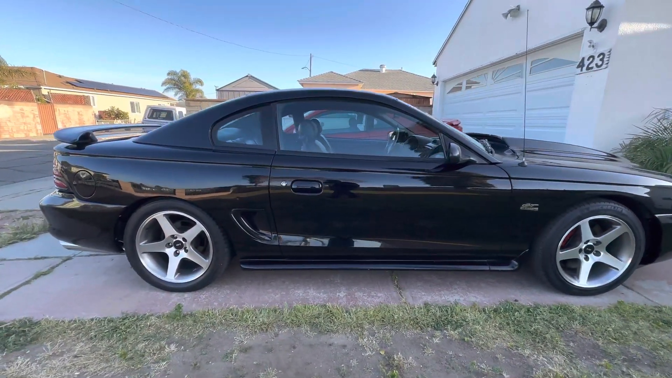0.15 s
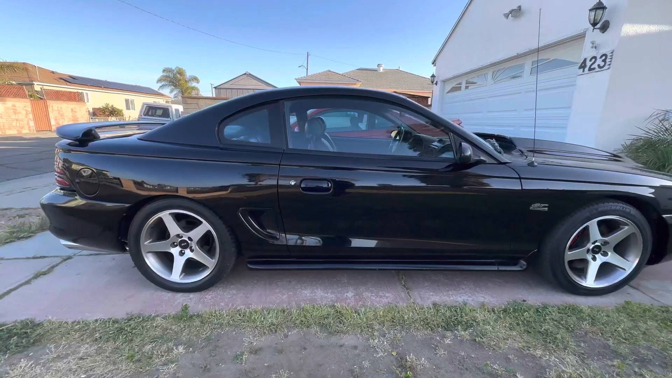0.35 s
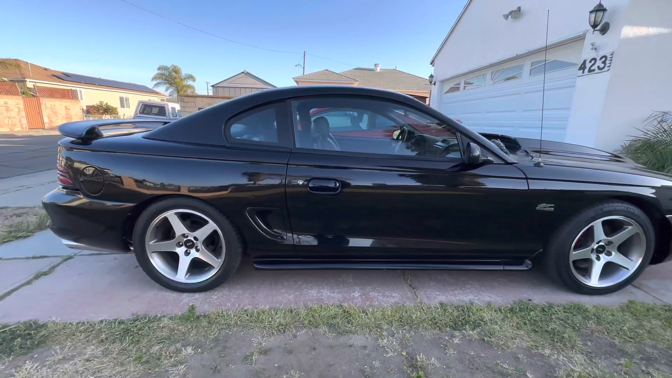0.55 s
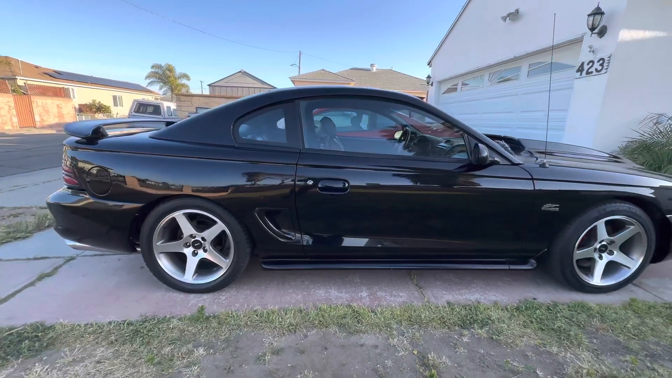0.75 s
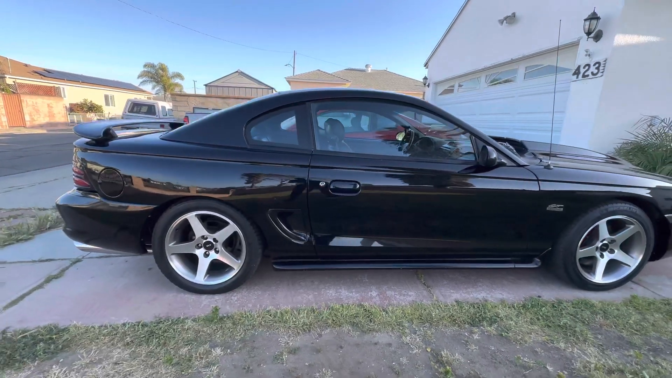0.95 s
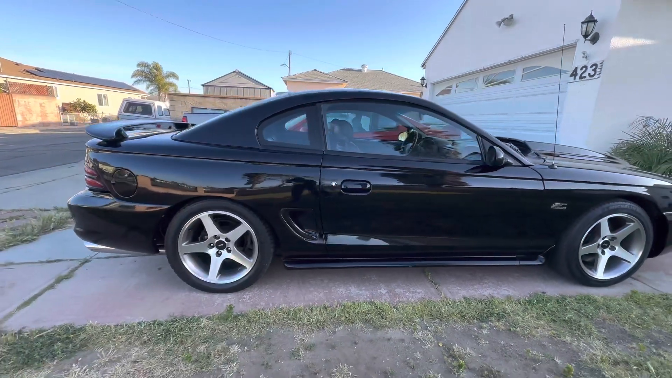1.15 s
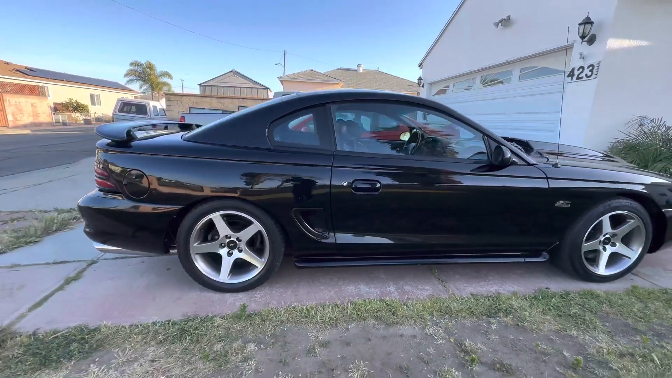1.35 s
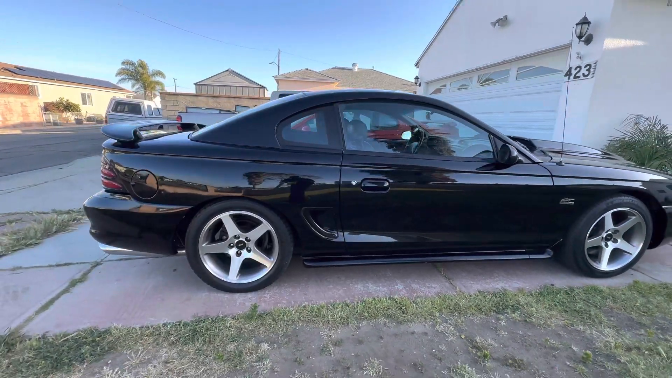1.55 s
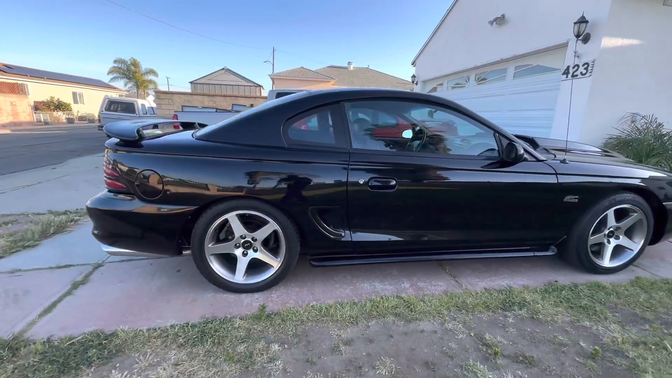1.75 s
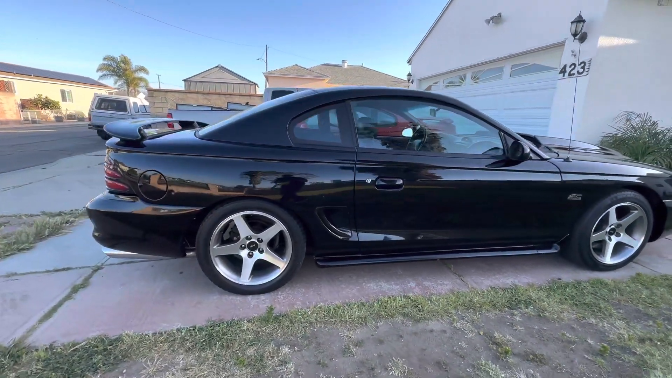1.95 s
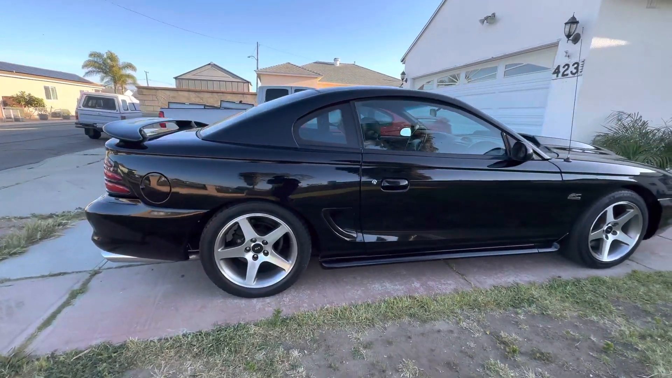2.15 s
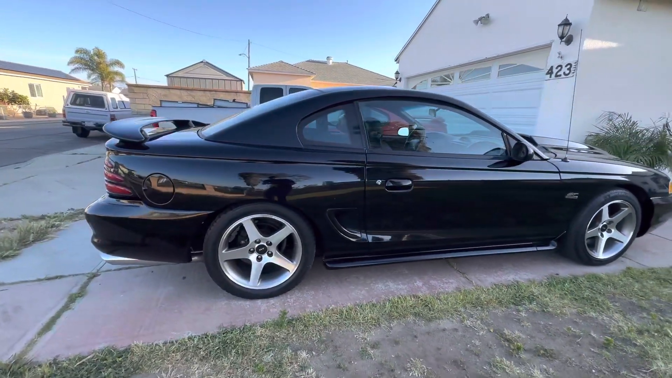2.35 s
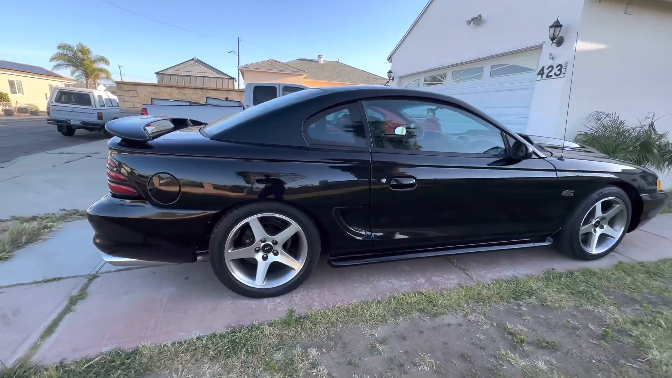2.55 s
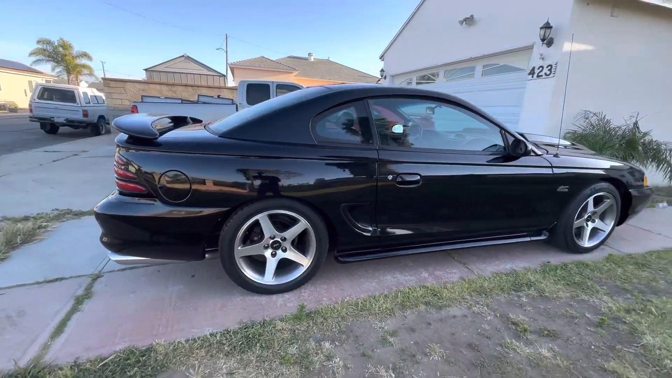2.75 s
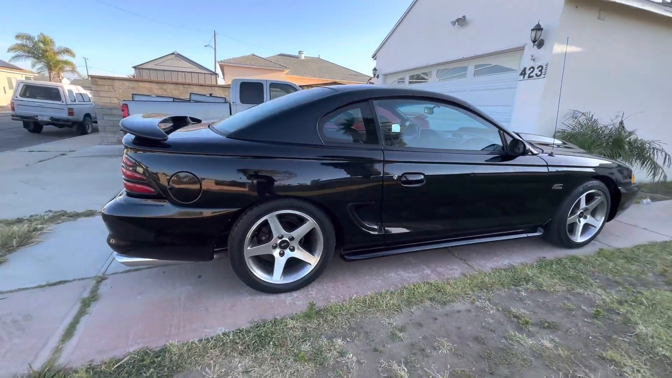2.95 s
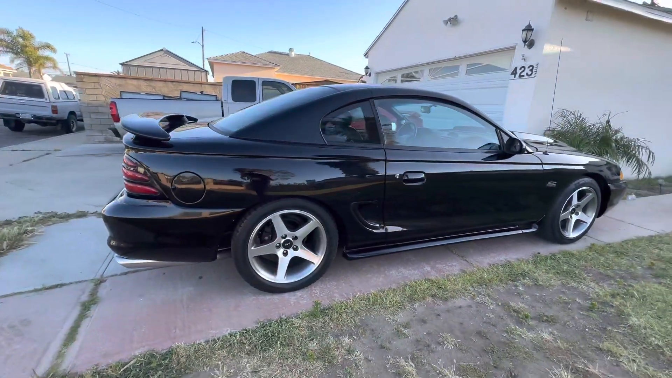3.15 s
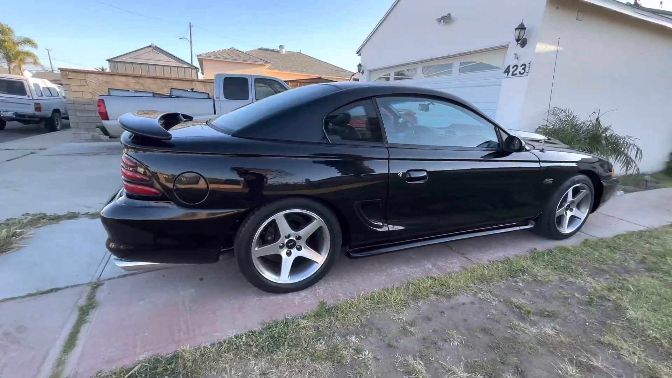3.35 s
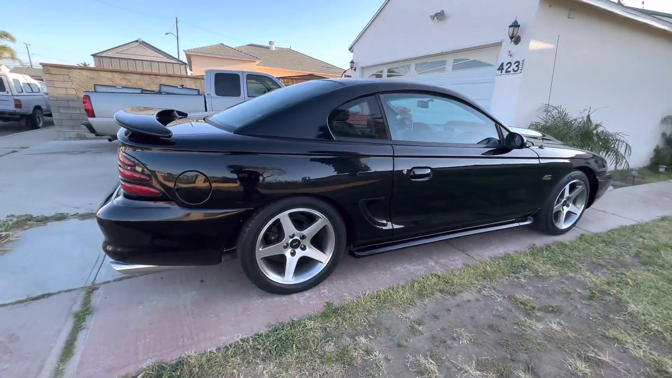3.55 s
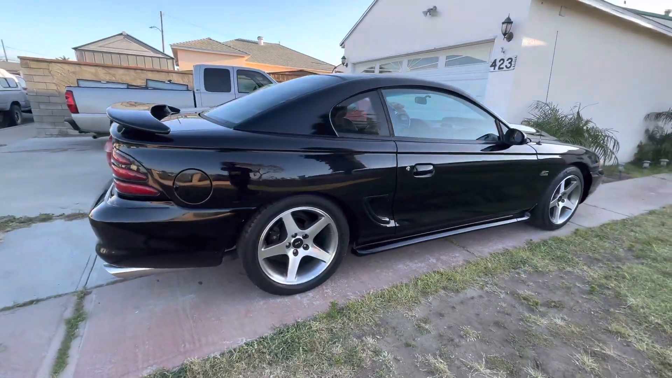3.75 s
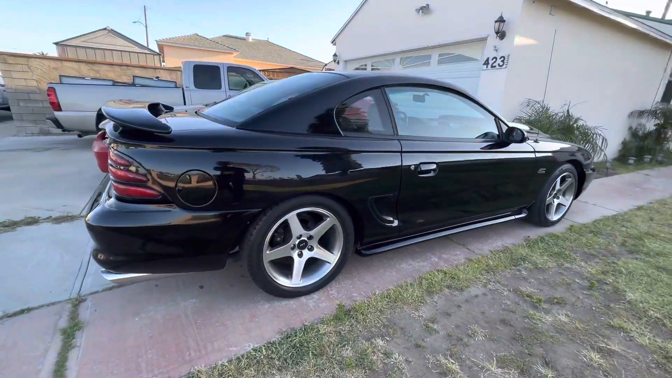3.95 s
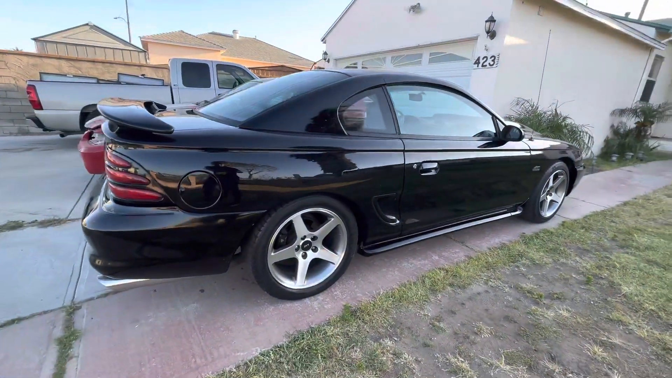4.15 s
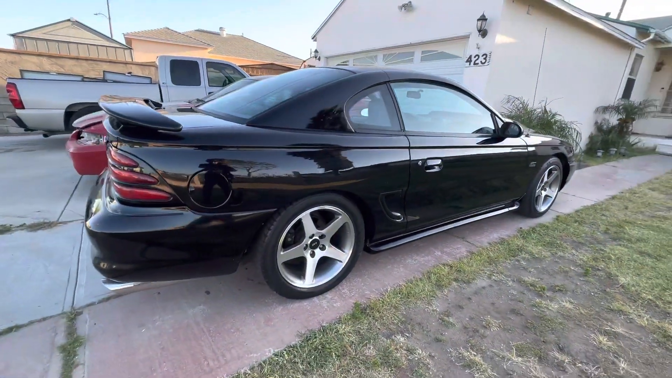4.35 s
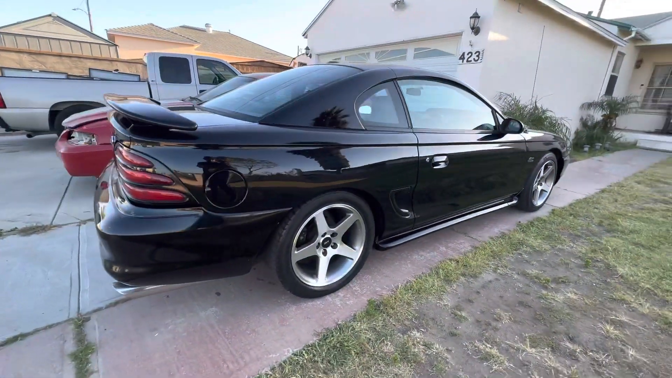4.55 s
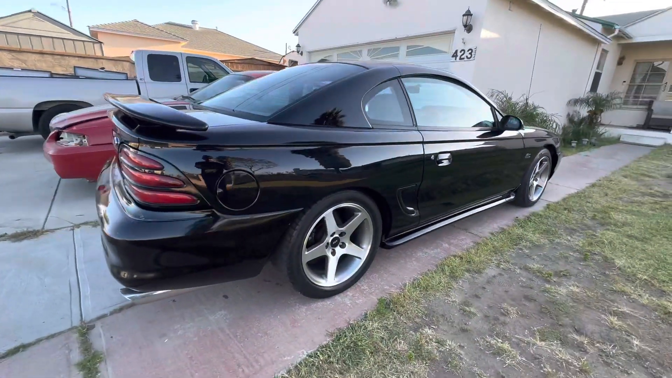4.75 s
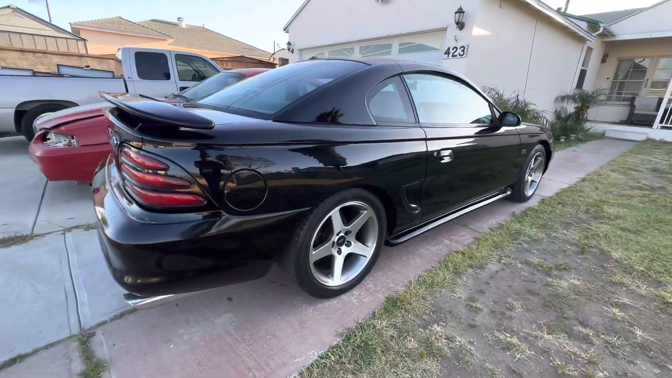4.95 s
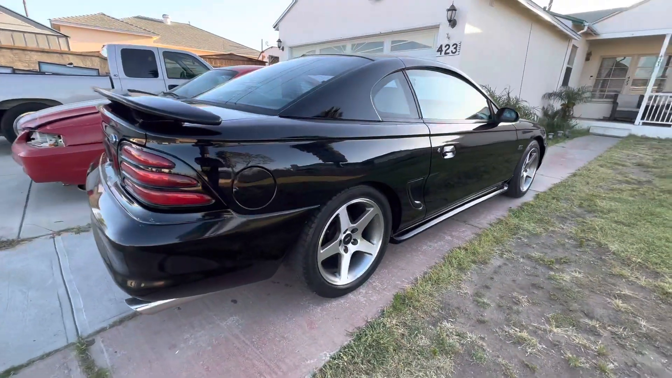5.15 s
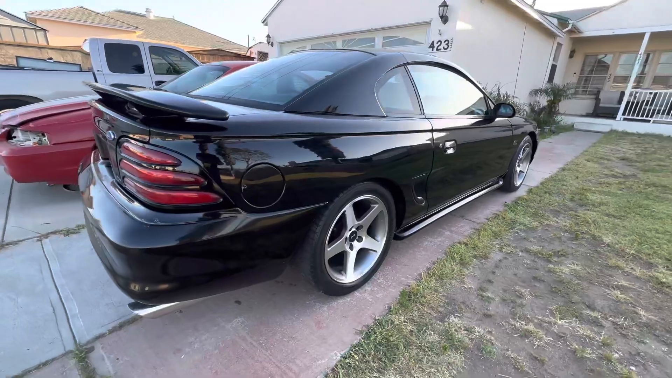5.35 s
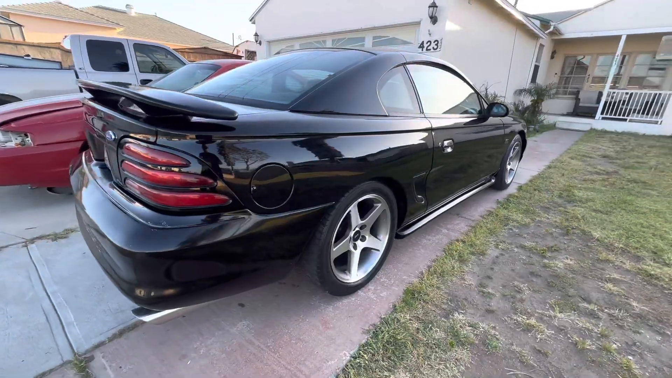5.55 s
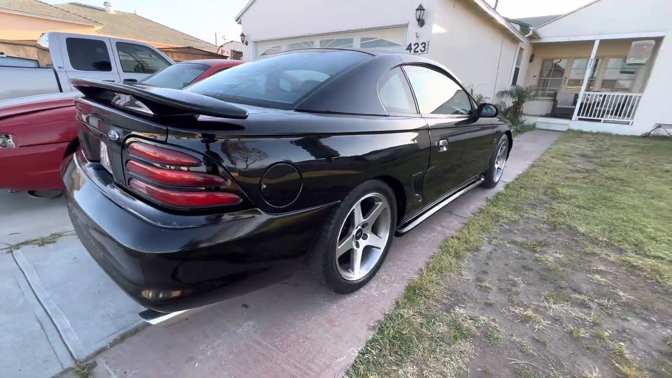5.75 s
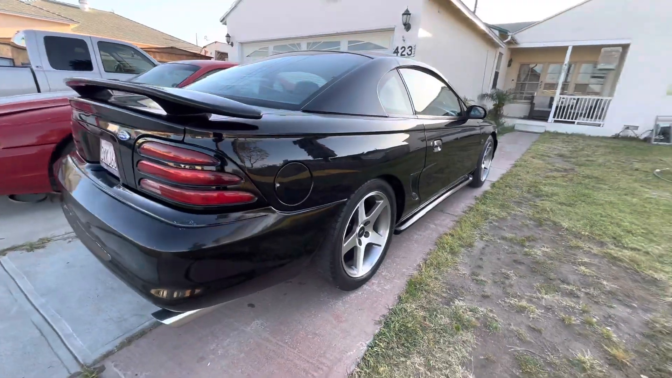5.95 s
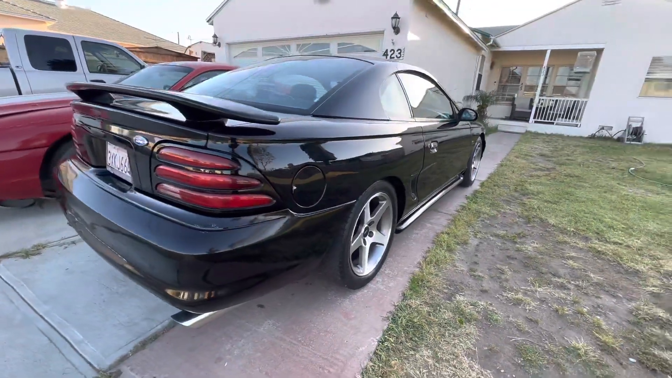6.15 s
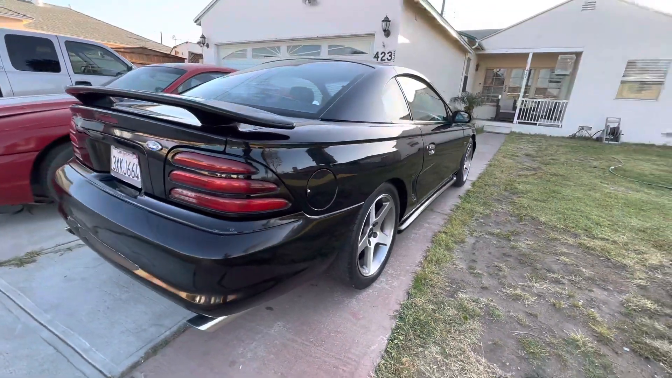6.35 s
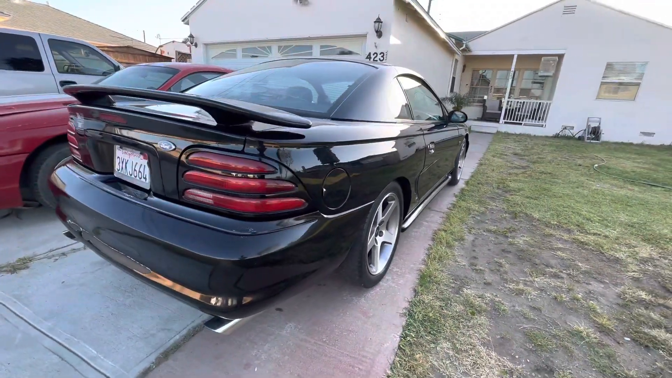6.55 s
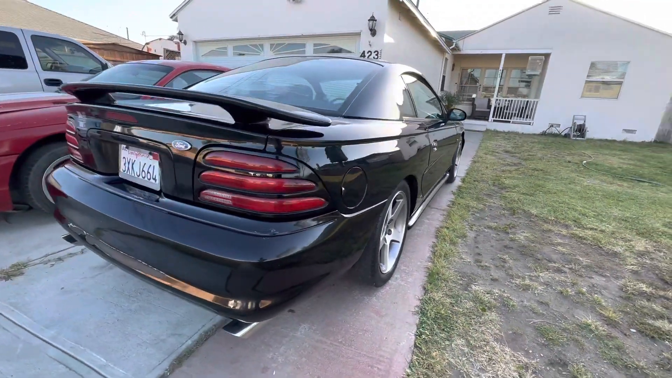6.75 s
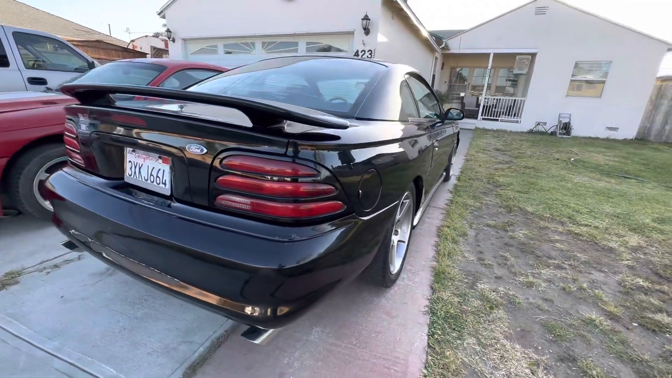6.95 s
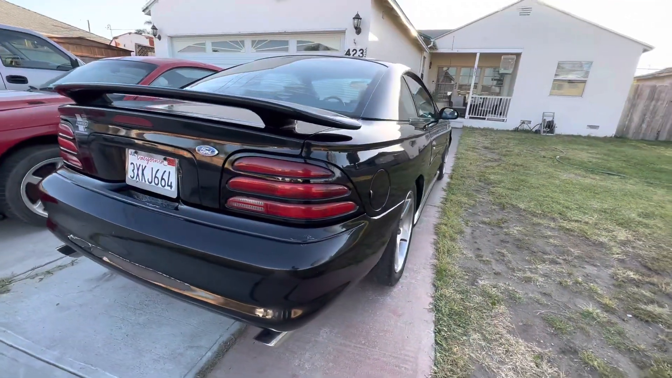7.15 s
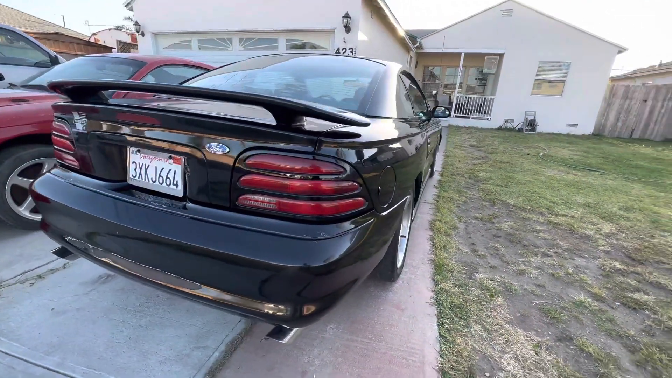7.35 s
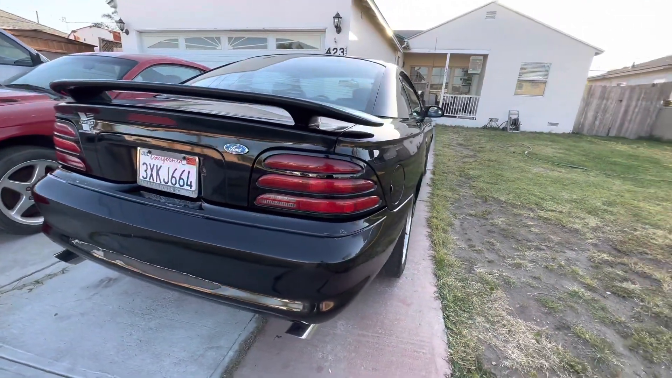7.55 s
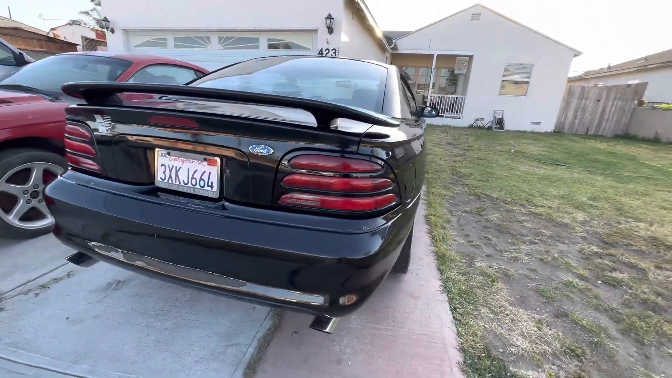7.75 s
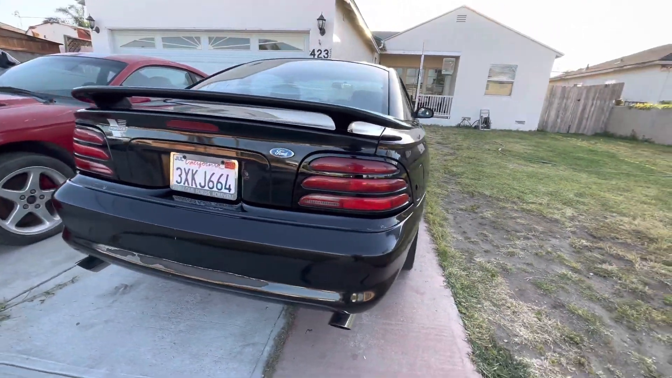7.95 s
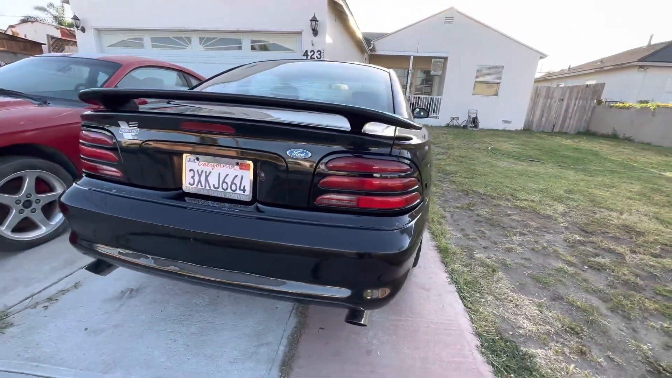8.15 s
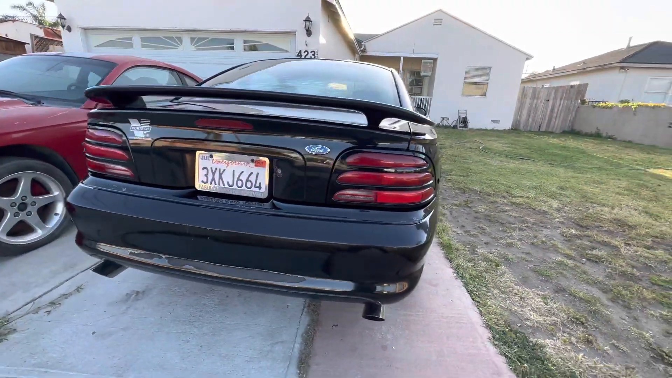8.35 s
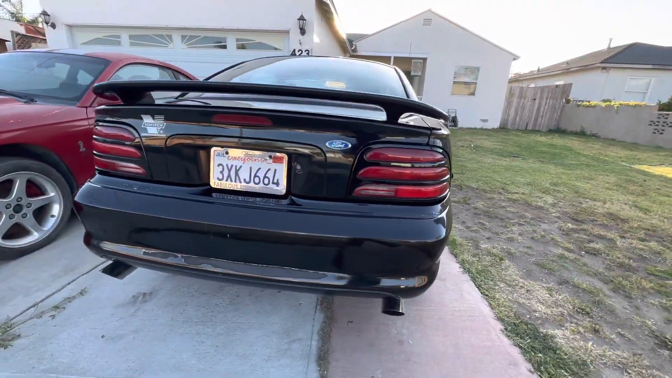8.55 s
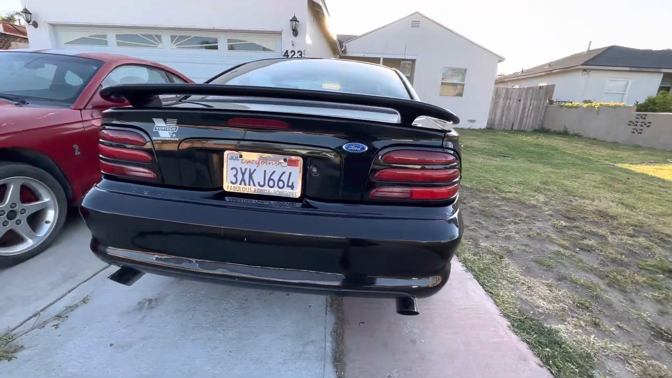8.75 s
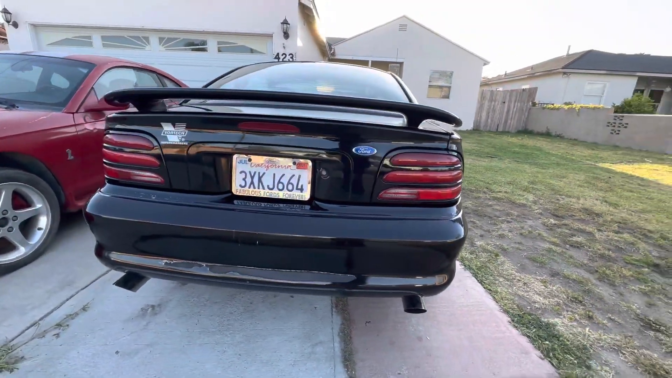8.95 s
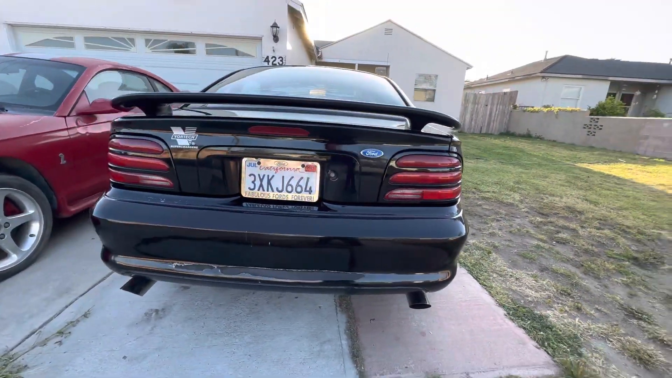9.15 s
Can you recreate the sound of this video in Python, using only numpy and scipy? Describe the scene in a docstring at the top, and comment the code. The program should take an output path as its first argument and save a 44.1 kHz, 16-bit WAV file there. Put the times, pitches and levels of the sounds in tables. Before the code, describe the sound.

Uneven, throaty V8 idle outdoors: belt whir, ticking and faint blower whine give way to deep thumping tailpipe burble, with two tiny distant bird chirps.

```python
"""A lumpy supercharged V8 idles in a driveway while the microphone walks from its side round to the tailpipes.
Eight uneven firings a cycle thump and burble through two pipes, and the idle sags and recovers at each stumble.
At the side the engine bay whirs, hisses, ticks and whines, over a low drone that dies away within 2.5 s.
A far bird chirps at 4.1 s; towards the rear the bay gets duller and mostly quieter, and the exhaust swells.
The bird chirps again, fainter, at 8.4 s. Pulses and noise ring through filters; the tones are mostly wavering sines."""
import sys
import numpy as np
from scipy import signal
from scipy.fft import rfft, irfft
from scipy.io import wavfile
from scipy.ndimage import uniform_filter1d, map_coordinates

SR = 44100
rng = np.random.default_rng(int(sys.argv[2]) if len(sys.argv) > 2 else 0)


def wav_record(signal):
    """Record a signal, one row per channel, as 16-bit PCM in the file named by sys.argv[1]."""
    frames = np.transpose(np.atleast_2d(signal))
    bounded = np.clip(frames, -1, 1)
    # unit amplitude maps onto the largest positive 16-bit level
    quanta = np.round(bounded * 32767).astype(np.int16)
    wavfile.write(sys.argv[1], SR, quanta)


N = 410130
TIME = np.arange(N) / SR
EDGE_HZ = 15750  # top of the band

# Stumbles of the engine, each changing the burn and braking the crank.
# Each row: time in seconds, change of firing strength in dB, slowing at its onset in rpm per second.
STUMBLES = [(.272, -4, 619), (1.013, -7, 780), (1.876, -7, 950), (2.536, 2.5, 564), (3.02, -4, 403.7),
            (3.918, -9.5, 600), (4.517, -7, 734), (5.314, 0, 1616), (5.552, -2.5, 360), (6.182, -4, 997),
            (6.703, -1, 723), (7.162, -1.5, 662.6), (7.902, -1, 663), (8.278, -2, 663), (9.158, -2, 963)]
# Delay of the left microphone port behind the right along the walk.
# Each row: time in seconds, delay of the exhaust in ms, delay of the engine bay in ms.
BEARING = [(0, -0.58, 0.43), (4.8, -0.45, 0.39), (5.3, -0.46, 0.1), (7.7, -0.32, -0.058),
           (8.1, -0.26, -0.32), (9.3, -0.24, -0.35)]
# Engine bay along the walk, before the trim of each layer.
# Each row: time in seconds, whir in dB, hiss in dB (the ticks follow the hiss).
BAY = [(0, -34.5, -47.5), (2.2, -36.5, -50.5), (4.2, -35.5, -51), (5.6, -38.5, -52.5), (7, -39.5, -55.5),
       (8.3, -39.5, -57), (9.3, -38.5, -52)]


def gain_of(db):
    """Decibels to amplitude."""
    return 10 ** (np.asarray(db) / 20)


def curve(rows, axis=1):
    """One column of a timed table at every sample."""
    rows = np.array(rows)
    return np.interp(TIME, rows[:, 0], rows[:, axis])


def evened(x, band=None):
    """Scales a sound to unit rms, overall or within a band in Hz."""
    if band is None:
        return x / x.std()
    hz = np.fft.rfftfreq(N, 1 / SR)
    inside = rfft(x)[(hz >= band[0]) & (hz <= band[1])]
    return x * N / np.sqrt(2 * np.sum(abs(inside) ** 2))


def noise():
    """White noise."""
    return rng.standard_normal(N)


def swell(span_s):
    """Slow random drift of unit rms: noise averaged over a span."""
    return evened(uniform_filter1d(noise(), size=max(int(span_s * SR), 2)))


def colour(x, points, size=8192):
    """Minimum-phase filter with the given spectrum: each pulse rings after it lands."""
    f, db = np.transpose(points)
    hz = abs(np.fft.fftfreq(size, 1 / SR))
    log_gain = np.log(gain_of(np.interp(np.log(hz + 1), np.log(f), db, right=-90)))
    spectrum = np.exp(np.conj(signal.hilbert(log_gain)))
    taps = np.fft.ifft(spectrum).real[:size // 2]
    return signal.oaconvolve(x, taps)[:N]


def blow(x, points, rise_ms=6.04, lean=0.53, size=8192):
    """A slug of gas swells and ebbs; the tip radiates its rate of change, a push and then a suck."""
    f, db = np.transpose(points)
    hz = np.fft.rfftfreq(size, 1 / SR)
    gain = gain_of(np.interp(np.log(hz + 1), np.log(f), db, right=-90))
    # the lean, in radians, deepens the suck; the rise sets the pulse later, by the time the slug takes to swell
    phase = lean - 2 * np.pi * hz * rise_ms / 1000
    taps = irfft(1j * gain * np.exp(1j * phase))
    return signal.oaconvolve(x, np.fft.fftshift(taps), "same")


def ring(hz, width, steadiness=0.55, count=20):
    """A narrow resonance, which may move, kept sounding by a steady flow: phase wanders more than strength."""
    coarse = TIME[::count]
    # two equal poles narrow the resonance, which the 1.5 makes up for
    r = np.exp(-np.pi * width * 1.5 * count / SR)
    drive = rng.standard_normal((len(coarse), 2)) @ [1, 1j]
    wander = signal.lfilter([1], [1, -2 * r, r * r], drive)
    wander = wander / (abs(wander) + 1e-9) ** steadiness
    carrier = np.exp(2j * np.pi * np.cumsum(hz * np.ones(N)) / SR)
    return evened((np.interp(TIME, coarse, wander) * carrier).real)


def ports(x, lag_ms):
    """The sound reaches the two microphone ports a moment apart."""
    shift = lag_ms * SR / 1000
    left = map_coordinates(x, [np.arange(N) - shift], order=3, mode="nearest")
    return np.array([left, x])


def outdoors(source, direct, shade_db=2.5, nearest_s=.002, farthest_s=.02, drift=.0006, count=6):
    """A direct path, echoes off ground and car that slide along the walk, and diffuse sound from the yard."""
    x = source()
    lag_ms = curve(BEARING, axis=2)
    echoes = np.zeros((2, N))
    for port in echoes:
        for place, slide, sign in rng.random((count, 3)):
            delay = nearest_s + farthest_s * place + drift * (2 * slide - 1) * TIME
            port += np.sign(sign - .5) * x[np.round((TIME - delay) * SR).astype(int) % N]
    diffuse = np.array([source(), source()])
    scatter = (echoes / np.sqrt(count) + 2 * diffuse) / np.sqrt(5)
    heard = np.sqrt(direct) * ports(x, lag_ms) + np.sqrt(1 - direct) * scatter
    # the port that faces the source is a little louder: shade in dB per ms of delay
    return heard * gain_of(shade_db * lag_ms * np.array([[-1], [1]]))


def bird():
    """A small bird far off: each chirp slides quickly down and levels off."""
    # Each row: start in seconds, level in dB.
    chirps = [(4.1, -54), (8.37, -61)]
    chirp_s, fall_s = 0.096, 0.013
    top_hz, end_hz = 6500, 4980
    out = np.zeros(N)
    for s, db in chirps:
        since = np.clip(TIME - s, 0, chirp_s)
        hz = end_hz + (top_hz - end_hz) * np.exp(-since / fall_s)
        out += gain_of(db) * np.sin(np.pi * since / chirp_s) * ring(hz, 200)
    return out


def drone():
    """A low sine with a moving level, perhaps a cooling fan, that stops abruptly."""
    # Each row: time in seconds, pitch in Hz, rms level in dB.
    run = [(0, 100.8, -26), (.7, 106, -22), (1.2, 106, -44), (1.7, 105.9, -24.5), (2.42, 105.8, -21.5)]
    stop_s, fade_db_per_s = 2.42, 160
    db = curve(run, axis=2) - fade_db_per_s * np.maximum(TIME - stop_s, 0)
    phase = 2 * np.pi * np.cumsum(curve(run, axis=1)) / SR
    return np.sqrt(2) * gain_of(db) * np.sin(phase)


def whistles(direct=0.52):
    """Panel resonances swell and fade as the microphone walks through their beams."""
    # Each row: pitch in Hz, width in Hz, level in dB, time of nearest approach in seconds, spread in seconds.
    beams = [(905, 19, -38, 3.46, 0.42), (904, 12, -36, 1.74, 0.16), (1104, 15, -38.5, 4.72, 0.49),
             (759, 19, -44.5, 6.3, 1.4), (564, 26, -43, 1.74, 1.17), (4315, 87, -54, 2.5, 0.86),
             (4390, 580, -52.5, 0.45, 1.7), (448.2, 49, -45, 3.56, 2.37), (2032, 46, -52.5, 8.9, 1.8),
             (4150, 270, -59, 6.4, 1.9), (1295, 23, -40, 2.6, 0.1), (1270, 24, -43, 1.55, 0.12),
             (1112, 17, -40.5, 0.3, 0.34), (1112, 17, -40.5, 3.6, 0.21), (1023, 36, -42, 3.5, 1.45),
             (1110, 28, -51.5, 9.4, 2.5), (742, 43, -43, 4.3, 0.6), (645, 42, -48.5, 5.63, 0.71),
             (652, 46, -46.5, 8.35, 0.26), (943, 41, -42.5, 2.77, 0.58), (1008, 22, -40.5, 1.33, 0.16)]

    def tones():
        """All the narrow tones together."""
        total = np.zeros(N)
        for hz, width, db, s, spread in beams:
            level = gain_of(db + 1.2 * swell(.25))
            passing = np.exp(-((TIME - s) / spread) ** 2 / 2)
            total += level * passing * ring(hz, width)
        return total

    near = ports(tones(), curve(BEARING, axis=2))
    scattered = ports(tones(), 45)  # so long a delay that the two ports sound unrelated
    return np.sqrt(direct) * near + np.sqrt(1 - direct) * scattered


def ticks(tick_db=-5, spread_db=4, per_s=90, ring_s=0.0022):
    """Belt and valve gear tick irregularly and unevenly, so that only a few ticks stand out of the hiss."""
    # Small metallic ticks. Each row: frequency in Hz, level in dB per Hz.
    tick_colour = [(800, -30), (1500, -12), (2100, 0), (2600, -3), (3200, -16), (4300, -15), (6200, -16),
                   (9000, -22), (14000, -34)]
    strength = gain_of(spread_db * np.minimum(rng.exponential(1, N), 2.2))
    hits = strength * (rng.random(N) < per_s / SR)
    burst = signal.lfilter([1], [1, -np.exp(-1 / (ring_s * SR))], hits)
    heard = np.array([evened(colour(noise() * burst, tick_colour)) for _ in range(2)])
    return gain_of(curve(BAY, axis=2) + tick_db) * heard


def engine_bay(firings, chuff=0.077, whir_db=1.67, hiss_db=3.0, rattle_db=-7.5, flutter_db=0.92, flicker_db=1.701):
    """Belts and blower whir, duller from behind; the valves rattle twice a firing and the intake hiss chuffs."""
    # Colours of the whir at the side and rear, the intake hiss and the valve gear's rattle.
    # Each row: frequency in Hz, level in dB per Hz.
    whir_side, whir_rear = [(100, -5.5), (300, -4), (450, -1.5), (600, -2.5), (750, -4), (1000, -5),
                            (1300, -8), (1550, -13), (2050, -10), (2500, -14.5), (3100, -24.5), (4500, -19)], [(100, 5), (300, 1), (450, -0.5), (630, 2), (750, 1),
                                               (1000, -1), (1250, -4), (1550, -10), (2050, -6.5),
                                               (2500, -9.5), (3100, -15.5), (4500, -28)]
    hiss_colour, rattle_colour = [(1500, -40), (3000, 3.5), (3550, 9.5), (4150, 12.5), (5000, 12),
                                  (6200, 14.8), (7100, 9.6), (8800, 6.3)], [(400, -23), (750, 1.5), (1000, 1), (1300, -7.5),
                                                (1700, -15), (5000, -28)]
    valve_ring = .2  # decay of a closing valve, as a share of the time to the next

    behind = np.clip((TIME - 3.5) / 2.0, 0, 1)
    valve = (2 * firings).astype(int)
    valve_size = gain_of(2.1 * rng.standard_normal(valve[-1] + 1))
    clatter = valve_size[valve] * np.exp(-(2 * firings % 1) / valve_ring)
    # one gulp for every two firings
    draw = (1 + chuff * np.cos(np.pi * firings)) * gain_of(flutter_db * swell(.05))
    # above its resonances the hiss falls away gently
    air = [(EDGE_HZ, hiss_colour[-1][1] - 10)]
    flicker = gain_of(flicker_db * swell(.06))
    treble = signal.butter(2, 1700, "high", fs=SR, output="sos")

    def whir():
        """Side and rear colours, blended along the walk."""
        flow = noise() * draw
        # the upper part flickers, at half depth
        flow = flow + (flicker - 1) * signal.sosfiltfilt(treble, flow) / 2
        side = evened(colour(flow, whir_side))
        rear = evened(colour(flow, whir_rear))
        return evened((1 - behind) * side + behind * rear)

    def hiss():
        """Intake air, drawn in gulps."""
        return evened(colour(noise() * draw, hiss_colour + air))

    rattle = np.array([evened(colour(noise() * clatter, rattle_colour)) for _ in range(2)])
    body = gain_of(whir_db) * outdoors(whir, direct=0.33) + gain_of(rattle_db) * rattle
    intake = gain_of(hiss_db) * outdoors(hiss, direct=0.088)
    return gain_of(curve(BAY, axis=1)) * body + gain_of(curve(BAY, axis=2)) * intake


def whine(rpm, width_hz=9, line_width_hz=20):
    """The blower's rotors beat out a cluster of lines; the housing rings on the middle one."""
    # Level along the walk. Each row: time in seconds, clear central tone in dB, cluster around it in dB.
    whine_level = [(0, -50, -49), (.35, -55, -44), (1.1, -57, -47), (1.3, -54, -55), (1.55, -46.5, -48),
                   (2.15, -57, -49), (2.35, -45, -45), (2.58, -39, -49), (2.87, -52, -45), (3.05, -44, -48),
                   (3.3, -48, -50), (3.55, -50, -41), (3.9, -49, -48.5), (5.3, -54, -45.5),
                   (5.55, -56, -58), (5.9, -48, -42.5), (6.25, -54, -47), (6.95, -62, -43.5),
                   (7.14, -43.5, -41), (7.5, -44, -43), (7.72, -60, -45), (7.92, -42, -48),
                   (8.15, -49, -44.5), (8.45, -54, -46), (8.7, -55, -45), (8.85, -57, -42.5),
                   (9.05, -57, -50), (9.16, -44, -45), (9.3, -49, -42)]
    # The cluster before it is evened. Each row: cycles per crank turn, relative level in dB.
    lines = [(84.6, -1.5), (86.8, 3.5), (88.6, -2.5), (90.8, 4), (92.8, -2.5)]
    whine_order = 88.6  # cycles per crank turn
    # the housing's resonance, and the share of the crank's wander that the central tone follows
    housing_hz, pull = 1235, 0.1995

    turns_per_s = rpm / 60
    hz = housing_hz + pull * (whine_order * turns_per_s - housing_hz)
    centre = ring(hz, width_hz, steadiness=0.67)

    def cluster():
        """All the lines together."""
        return evened(sum(gain_of(db) * ring(order * turns_per_s, line_width_hz) for order, db in lines))

    around = np.array([cluster(), cluster()])
    return gain_of(curve(whine_level, axis=1)) * centre + gain_of(curve(whine_level, axis=2)) * around


def crank_speed():
    """Idle speed in rpm: every stumble makes it sag, and the idle control recovers with a slow overshoot."""
    idle_rpm = 852.2
    sag_s, recover_s, hunt_hz = .2, .4001, .4509
    # the idle is already hunting at the start: how far it is down, and how hard it swings back up
    start_low_rpm, start_swing_rpm = 60.75, 98.17

    turn = 2 * np.pi * hunt_hz * TIME
    hunting = start_swing_rpm * np.sin(turn) - start_low_rpm * np.cos(turn)
    rpm = idle_rpm + np.exp(-TIME / recover_s) * hunting
    for s, _, slowing in STUMBLES:
        since = np.maximum(TIME - s, 0)
        sag = slowing * sag_s * (1 - np.exp(-since / sag_s))
        rpm -= sag * np.exp(-since / recover_s) * np.cos(2 * np.pi * hunt_hz * since)
    return rpm


def exhaust(firings, unsteady=0.29, bank_unsteady=0.27, jitter=0.051, gust_db=-10.5, rasp_db=-14, puff_length=0.5):
    """A pulse per firing; the cross-plane crank deals them unevenly to the two pipes, which makes the burble."""
    # Level along the walk. Each row: time in seconds, thump of both pipes in dB,
    # hollow ring of the nearer pipe in dB.
    walk = [(0, -32.5, -38.5), (1.4, -30.5, -38.5), (2.4, -30, -39.5), (3.3, -28, -33.5),
            (4.5, -25.5, -31.5), (5.5, -23, -32), (5.9, -22, -31), (6.4, -23.5, -32), (7.3, -20.5, -30.5),
            (8.1, -21, -39.5), (9.3, -19.5, -31.5)]
    # Burble between the pipes. Each row: time in seconds, level in dB.
    burble_level = [(0, -24.5), (.9, -24), (1.2, -25), (1.8, -24), (2.3, -26), (3.1, -23.5), (3.7, -24.5),
                    (4.4, -26.5), (5.3, -23.5), (6.6, -25.5), (8, -23), (9.3, -23)]
    # Cylinders in firing order. Each row: strength in dB, lateness in firing intervals,
    # bark in the nearer pipe in dB.
    cylinders = [(-0.1, 0.37, -3.6), (1.2, 0.36, -2.1), (0.1, 0.38, -11), (-2.4, 0.41, -18),
                 (0.7, 0.35, 2.7), (-1.2, 0.35, -14.6), (0.9, 0.37, -2.3), (0.3, 0.36, 1.7)]
    # Pipe fed by each firing, in firing order: -1 or 1.
    bank = [-1, 1, -1, -1, 1, -1, 1, 1]
    # Pipe responses, before each is evened. Each row: frequency in Hz, level in dB.
    thump_colour, burble_colour, hollow_colour = [(15, -43), (28, -28), (42, -36), (56, 6.5), (80, -1),
                                                  (112, 6.5), (145, 1.5), (170, -16), (200, -20),
                                                  (240, -8.5), (290, -50), (380, -73), (800, -74)], [(20, -60.5), (50, -16.5), (77, -8.5),
                                                                 (100, -20.5), (130, -4), (143, 1),
                                                                 (155, 5), (170, -13.5), (190, -7.5),
                                                                 (215, -15.5), (330, -45), (800, -67)], [(80, -30.5), (170, -25.5),
                                                                                 (205, -7), (238, 8),
                                                                                 (262, -4), (290, -10),
                                                                                 (340, -35.5), (800, -48)]
    # Turbulent gas at the tip. Each row: frequency in Hz, level in dB.
    gust_colour = [(20, -20), (45, -4), (90, -5), (125, -11), (170, 1.5), (205, -4), (250, -2.5),
                   (310, -26), (450, -50), (1500, -66)]
    # Rasp of each bark. Each row: frequency in Hz, level in dB per Hz.
    rasp_colour = [(200, -14), (380, -2), (550, -4.5), (800, -5), (1500, -14), (4000, -45)]
    falter_s = 0.032  # how long the burn stays changed around a stumble
    bark_lead_s = 0.00318  # the bark cracks out this much ahead of the slug of gas

    number = np.arange(int(firings[-1]))
    place = number % len(bank)
    strength_db, late, bark_db = np.array(cylinders)[place].T
    burn, imbalance, slip, bark = rng.standard_normal((len(number), 4)).T
    # a weak burn leaves fuel behind, so the next one is stronger
    burn = evened(burn - 0.87 * np.roll(burn, 1))
    at = np.minimum(np.searchsorted(firings, number + late + jitter * slip), N - 1)
    falter_db = sum(db * np.exp(-((at / SR - s) / falter_s) ** 2) for s, db, _ in STUMBLES)
    size = gain_of(strength_db + falter_db) * (1 + unsteady * burn)
    side = np.array(bank)[place] + bank_unsteady * imbalance

    thump = evened(blow(np.bincount(at, size, N), thump_colour), (40, 85))
    burble = evened(colour(np.bincount(at, size * side, N), burble_colour), (130, 200))

    # a few cylinders bark into the nearer pipe's hollow resonance: the lope, twice a cycle
    near_pipe = size * side * gain_of(bark_db + 2.0 * bark)
    hollow = evened(colour(np.bincount(at, near_pipe, N), hollow_colour), (215, 300))
    cracks = np.bincount(at, abs(near_pipe), N)
    crack_tails = signal.lfilter([1], [1, -np.exp(-1 / (0.012 * SR))], cracks)  # 12 ms decay
    rasp = evened(colour(noise() * crack_tails, rasp_colour))
    bark_sound = np.roll(hollow + gain_of(rasp_db) * rasp, -round(bark_lead_s * SR))

    # each pulse drags a puff of turbulent gas out of the tip; its length is in firing intervals
    puffs = np.exp(-((firings - late.mean()) % 1) / puff_length)
    gusts = gain_of(gust_db) * evened(colour(noise() * puffs, gust_colour))

    sound = gain_of(curve(walk, axis=1)) * (thump + gusts)
    sound += gain_of(curve(burble_level)) * burble
    sound += gain_of(curve(walk, axis=2)) * bark_sound
    return ports(sound, curve(BEARING, axis=1))


def scene():
    """One crankshaft drives exhaust, valves and blower."""
    rpm = crank_speed()
    firings = np.cumsum(rpm) * 4 / 60 / SR  # four firings a turn, counted up
    background = bird() + drone()
    bay = whistles() + ticks() + engine_bay(firings) + whine(rpm)
    return background + bay + exhaust(firings)


def record(dry):
    """A steep low-pass takes away the treble above the band edge."""
    taps = signal.firwin(511, EDGE_HZ, window=("kaiser", 9), fs=SR)
    return signal.oaconvolve(dry, taps[None], "same")


dry = scene()
out = record(dry)
wav_record(out)
```